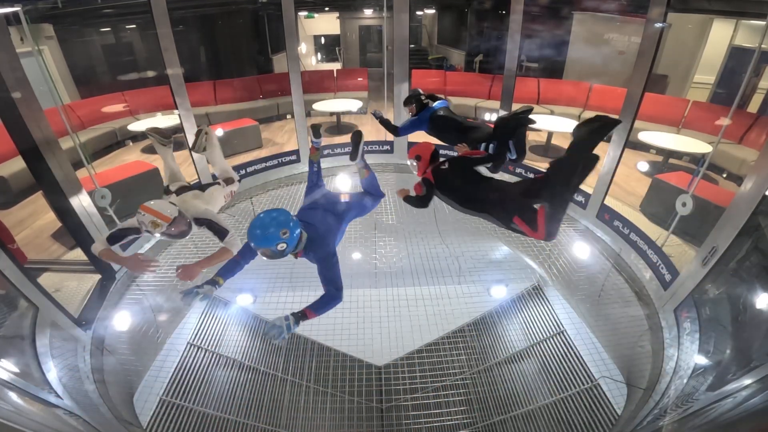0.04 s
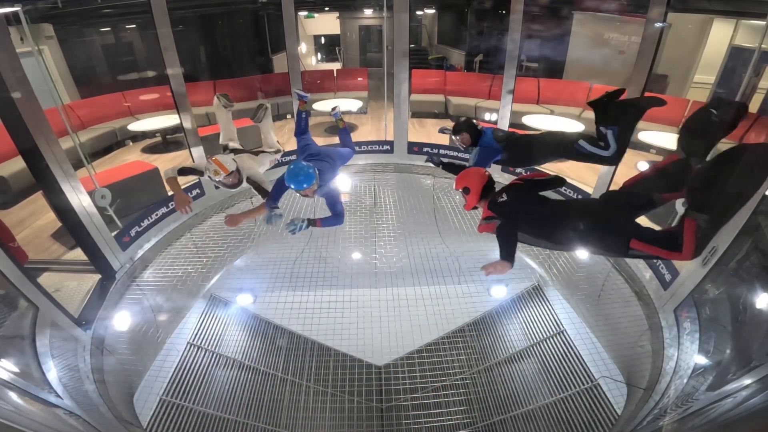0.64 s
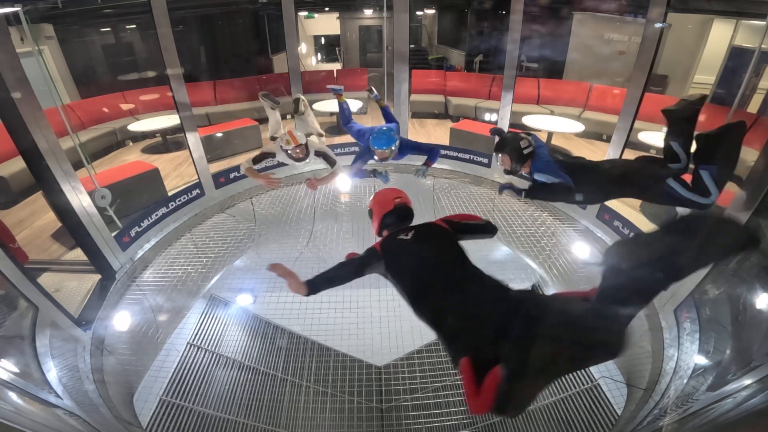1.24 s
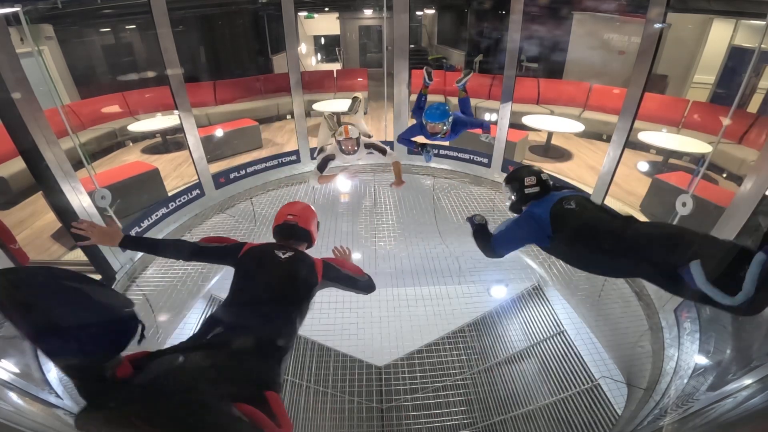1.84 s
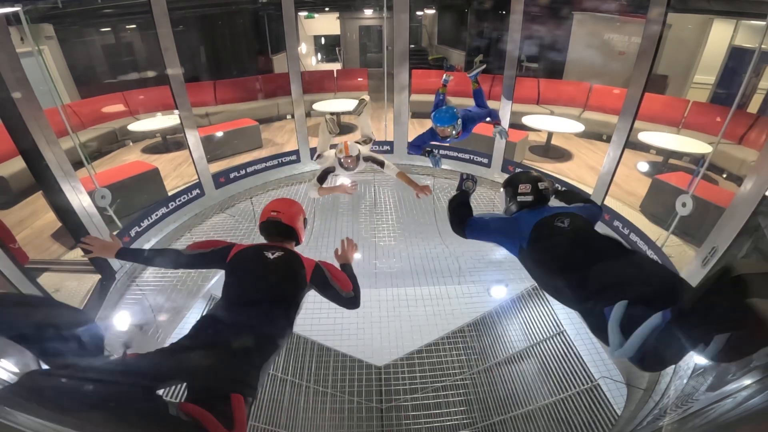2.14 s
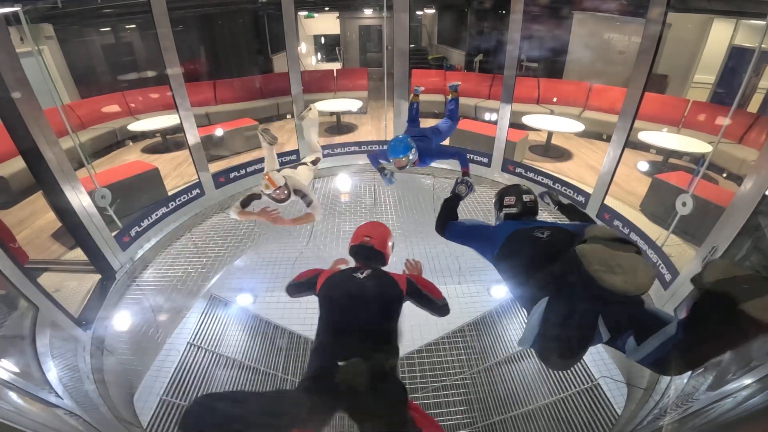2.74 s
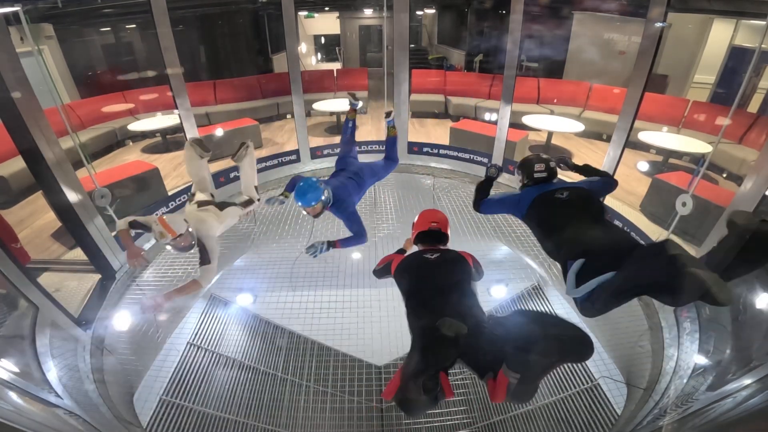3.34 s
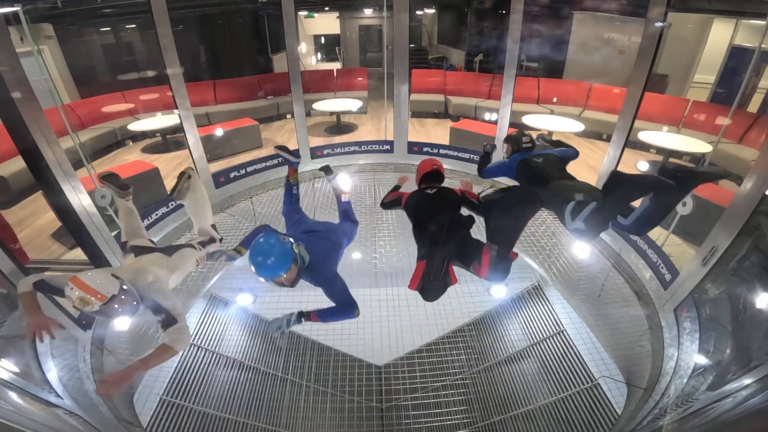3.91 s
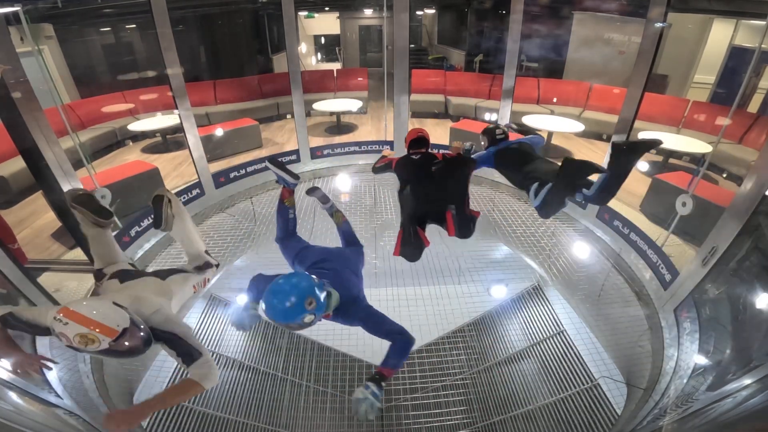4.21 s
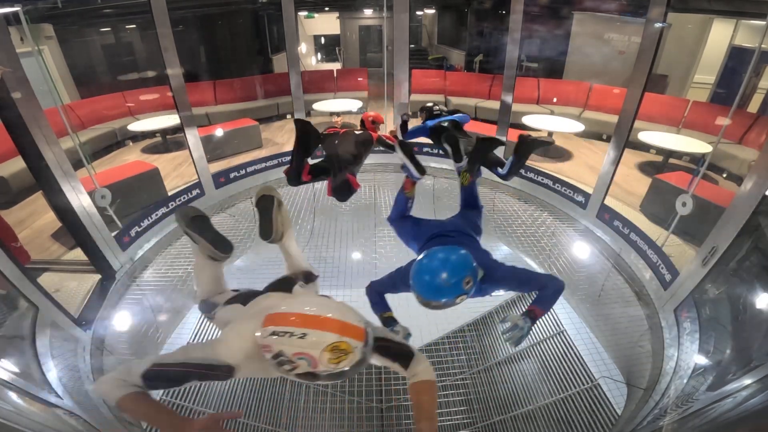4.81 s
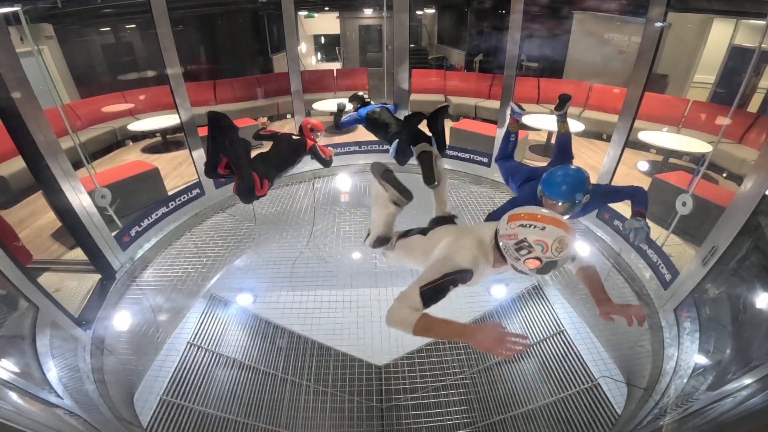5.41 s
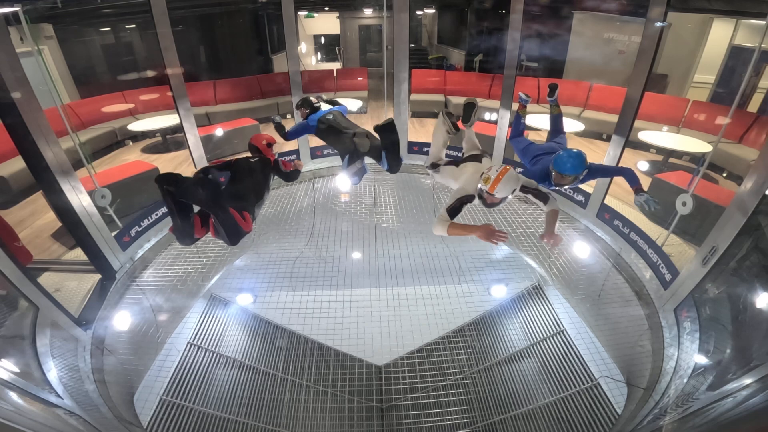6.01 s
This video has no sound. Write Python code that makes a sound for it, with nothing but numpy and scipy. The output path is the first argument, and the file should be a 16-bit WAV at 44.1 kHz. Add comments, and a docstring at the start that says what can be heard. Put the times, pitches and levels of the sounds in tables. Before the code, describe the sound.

Air roars loudly and steadily up the glass chamber of a vertical wind tunnel, heard from inside as flyers circle. A hollow boom swells and eases a little, over a very low throb that comes in spells. A broad, shrill whistle from the wire floor net and a fine hiss run throughout. A flyer's pass adds a soft whoosh at the start and a fainter one later.

```python
"""A booming roar of air over a very low throb: a vertical wind tunnel, with flyers circling.
Turbulent air roars up the glass chamber and booms in the standing waves of duct and chamber,
while the air column throbs in spells. The flyers' wakes swell the booming and weaken the throb;
a near pass adds a soft whoosh. The wires of the floor net shed vortices: a broad, shrill
whistle over a fine hiss."""
import sys
import numpy as np
from scipy.fft import rfft, irfft, next_fast_len
from scipy.io import wavfile
from scipy.ndimage import uniform_filter1d, minimum_filter1d, map_coordinates

SR = 44100
rng = np.random.default_rng(int(sys.argv[2]) if len(sys.argv) > 2 else 0)


def generate_wav(signal):
    """Clip the signal to [-1, 1] and save it as 16-bit WAV at the path in sys.argv[1]."""
    frames = np.transpose(np.atleast_2d(signal))
    scaled = np.clip(frames, -1, 1) * 32767
    pcm = np.round(scaled).astype(np.int16)
    wavfile.write(sys.argv[1], SR, pcm)


N = 271656

# Strength of the flyers' wakes. Each row: time in seconds, dB over the usual.
WAKE_STRENGTH = [(0, -0.5), (.5, 0.9), (1.05, 2.3), (1.65, -1.8), (2.25, -.2), (2.9, -2.5), (3.4, 0.5),
                 (4.1, 2.5), (4.55, 2), (4.8, -1), (5.15, -1.6), (5.95, -0.7), (6.16, -1.2)]
# Level ride of the hiss. Each row: time in seconds, level in dB.
HISS_RIDE = [(0, -28.8), (.7, -30.5), (1.15, -29.5), (2.5, -28), (4.4, -28.5), (6.16, -30)]


def amp(db):
    """Decibels to gain."""
    return 10 ** (np.asarray(db) / 20)


def unit(x):
    """Scale to rms 1."""
    return x / np.sqrt(np.mean(x ** 2) + 1e-20)


def along(points, hz):
    """Read (Hz, value) points on a log frequency axis."""
    point_hz, values = np.transpose(points)
    return np.interp(np.log(hz + 1), np.log(point_hz + 1), values)


def envelope(points):
    """Join (seconds, value) points into one value per sample."""
    seconds, values = np.transpose(points)
    return np.interp(np.arange(N) / SR, seconds, values)


def wobble(rate):
    """A smooth random curve with `rate` knots a second."""
    knots = rng.standard_normal(int(N * rate / SR) + 4)
    return map_coordinates(knots, [np.arange(N) * rate / SR])


def resonances(modes, hz):
    """Gain of independently driven resonances with steep skirts; their powers add."""
    powers = (amp(db) ** 2 / (1 + ((hz - centre) / width) ** 2) ** 2 for centre, width, db in modes)
    return np.sqrt(sum(powers))


def turbulence(gain):
    """Stereo noise of rms 1, coloured by gain(Hz), as two microphone ports pick it up."""
    # Long waves reach both ports alike, short ones differ. Each row: frequency in Hz, likeness 0-1.
    likeness = [(60, 1), (200, 1), (500, 0.96), (1000, 0.84), (1500, 0.82), (2100, 0.54), (3700, 0.6),
                (4800, 0.82), (7500, 0.61), (10200, 0.7), (12000, .25), (14000, 0.36)]
    # The camera body shades one port. Each row: frequency in Hz, left minus right in dB.
    balance = [(40, 0.5), (130, -0.8), (300, 0.4), (550, 1.4), (1100, 1.8), (1600, 0.3), (2500, 0.4),
               (3300, 2.4), (4200, 2), (5500, -0.5), (7500, 1.8), (10200, 1), (11900, 9.5), (13500, 3)]
    # It also delays one port. Each row: frequency in Hz, left's phase lead in radians.
    phase_lead = [(200, -0.035), (500, 0.029), (1400, 0.18), (2000, 0.04), (3300, -0.79), (3600, -0.21),
                  (4000, -0.39), (4700, 0.14), (9000, 0)]
    size = next_fast_len(N + 8192)
    hz = np.fft.rfftfreq(size, 1 / SR)
    shared, apart = rfft(rng.standard_normal((2, size))) * gain(hz)
    spread = np.arccos(np.clip(along(likeness, hz), 0, .994)) / 2
    mid, side = shared * np.cos(spread), apart * np.sin(spread)
    lean = amp(along(balance, hz) / 2) * np.exp(1j * along(phase_lead, hz) / 2)
    return unit(irfft([(mid + side) * lean, (mid - side) / lean], size)[:, :N])


def throb(pitch_hz=37.3, drift_hz=0.53, edge_s=0.045, flutter_db=0.6, rumble_db=-20.2):
    """The air column swings at one low pitch, best in calm air; wakes bring a rumble of large eddies."""
    # Spells of throbbing. Each row: start in seconds, end in seconds, level in dB at the usual wake.
    spells = [(0, .45, -17), (.6, 1, -23), (1.168, 3.362, -16.5), (4.63, 6.16, -17.5)]
    # Tone colour of the large eddies. Each row: frequency in Hz, relative level in dB.
    rumble_eq = [(4, -12), (10, 3), (24, 2), (33, 8.5), (44, -8), (55, -17), (85, -26), (105, -35),
                 (400, -100)]
    wake_db = envelope(WAKE_STRENGTH)
    t = np.arange(N) / SR
    gate = sum(amp(db) * (np.tanh((t - start) / edge_s) - np.tanh((t - end) / edge_s)) / 2
               for start, end, db in spells)
    swing = unit(np.sin(2 * np.pi * np.cumsum(pitch_hz + drift_hz * wobble(8)) / SR))
    pan = amp([[-.3], [.3]])  # a touch to the right
    tone = swing * gate * amp(flutter_db * wobble(14) - 0.67 * wake_db) * pan
    rumble = turbulence(lambda hz: amp(along(rumble_eq, hz)))
    return tone + rumble * amp(rumble_db + wake_db)


def boom(duct_db=-28, chamber_db=-21, surge_db=.5):
    """Wakes behind the flyers drive the standing waves of duct and chamber."""
    # The duct's lowest standing waves. Each row: pitch in Hz, width in Hz, relative level in dB.
    duct_modes = [(64.8, 8.1, -3), (75.4, 11, -9), (83.2, 7.8, -4.5)]
    # The flight chamber's standing waves, with the same columns.
    chamber_modes = [(110.7, 5.4, -5.5), (124.8, 5.9, -1), (128.2, 6.5, -3), (142, 6.2, -5.5),
                     (158.5, 9.2, 1), (175.5, 5.9, 1), (195, 7, -12), (228.7, 11.3, -7), (243.5, 6.6, -5),
                     (257.4, 9, -10), (265.3, 6.1, -1.5), (275, 8.5, -10.5), (306.4, 8.1, -8.5),
                     (325.3, 9.6, -8.5), (344, 8.9, -11), (369.2, 13.3, -8)]
    wake_db = envelope(WAKE_STRENGTH)
    duct = amp(duct_db + 1.5 * wake_db) * turbulence(lambda hz: resonances(duct_modes, hz))
    chamber_gain = amp(chamber_db + 0.9 * wake_db + surge_db * wobble(4.97))
    return duct + chamber_gain * turbulence(lambda hz: resonances(chamber_modes, hz))


def rush(roar_db=-22.5, gust_db=.45, flicker_db=0.44):
    """The main stream roars between the glass walls; its smallest eddies hiss."""
    # Tone colours of roar and hiss. Each row: frequency in Hz, relative level in dB.
    roar_eq = [(20, -30), (100, -15), (160, 1.5), (300, 0.5), (400, 0), (550, -0.5), (800, -1.5),
               (1080, -2), (1280, -4.5), (1600, -7), (2200, -18), (6000, -88)]
    hiss_eq = [(500, -25), (1400, -5), (1900, -0.5), (2800, -1), (4400, -5), (6000, -12), (7600, -13),
               (8100, -20.5), (10250, -22.5), (10900, -28.5), (12200, -30), (13000, -36), (14200, -39),
               (15600, -54)]
    # Narrow resonances in the roar. Each row: pitch in Hz, width in Hz, dB over the roar.
    wall_modes = [(418, 27, 1.5), (465, 5.9, 4.5), (488, 6.4, -1), (515, 5.7, 1.5), (602, 32, -2.5),
                  (945, 32, -1.5), (1120, 58, 1)]
    roar = turbulence(lambda hz: amp(along(roar_eq, hz)) * np.hypot(1, resonances(wall_modes, hz)))
    hiss = turbulence(lambda hz: amp(along(hiss_eq, hz)))
    roar_gain = amp(roar_db + 0.21 * envelope(WAKE_STRENGTH) + gust_db * wobble(9))
    hiss_gain = amp(envelope(HISS_RIDE) + flicker_db * wobble(14))
    return roar * roar_gain + hiss * hiss_gain


def pass_swell(fade_s=0.4):
    """Gain of the whoosh: it swells as a flyer nears and falls to 1/e at fade_s past the peak."""
    # Flyers sweeping close by. Each row: time of the peak in seconds, peak level in dB.
    passes = [(.08, -27), (3.95, -33.5)]
    t = np.arange(N) / SR
    return sum(amp(db) * np.exp(-((t - peak_s) / fade_s) ** 2) for peak_s, db in passes)


def flyer_whoosh():
    """Air tears softly past the suit of a nearby flyer."""
    # The band of the tearing air. Each row: centre in Hz, width in Hz, relative level in dB.
    suit_band = [(1190, 410, 0)]
    return pass_swell() * turbulence(lambda hz: resonances(suit_band, hz))


def net_whistle(level_db=-20.0, duck_db=0.6):
    """The net's wires shed vortices: a whistle that follows the air speed in pitch."""
    # Tone colour of the shed vortices. Each row: frequency in Hz at usual speed, relative level in dB.
    vortex_eq = [(1800, -90), (2500, -30), (2800, -28), (3000, -10.5), (3200, -4), (3420, -2), (3560, 0.2),
                 (3680, 1.6), (3800, -1), (3930, -5.5), (4100, -13.5), (4400, -26.5), (6500, -100)]
    # Air speed at the floor net. Each row: time in seconds, per cent over the usual.
    air_speed = [(0, -0.39), (2.8, -.5), (3.25, 1.7), (3.7, .4), (4.5, -.1), (6.16, 0.48)]
    band = turbulence(lambda hz: amp(along(vortex_eq, hz)))
    playhead = np.cumsum(1 + envelope(air_speed) / 100)
    whistle = np.array([map_coordinates(port, [playhead], mode="mirror") for port in band])
    # The whistle weakens as the hiss grows, and ducks slightly while the whoosh swells.
    hiss_db = envelope(HISS_RIDE)
    swell = pass_swell() / pass_swell().max()
    return whistle * amp(level_db - .4 * (hiss_db - hiss_db.mean()) - duck_db * swell)


def scene():
    """All the layers of moving air, sounding together from the start."""
    return throb() + boom() + rush() + flyer_whoosh() + net_whistle()


def record(dry):
    """A limiter ducks the highest peaks, then a brick-wall low-pass trims the very top."""
    ceiling, duck_s, top_hz = .82, .008, 15700
    span = int(duck_s * SR)
    needed_gain = ceiling / np.maximum(np.abs(dry).max(axis=0), ceiling)
    limited = dry * uniform_filter1d(minimum_filter1d(needed_gain, 2 * span + 1), span)
    size = next_fast_len(N + SR // 2)
    passband = np.fft.rfftfreq(size, 1 / SR) < top_hz
    return irfft(rfft(limited, size) * passband, size)[:, :N]


dry = scene()
out = record(dry)
generate_wav(out)
```